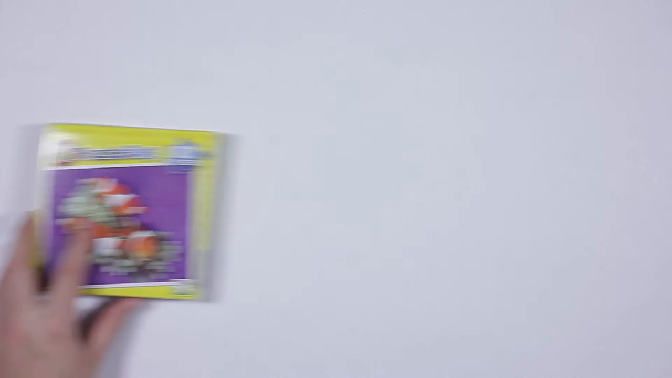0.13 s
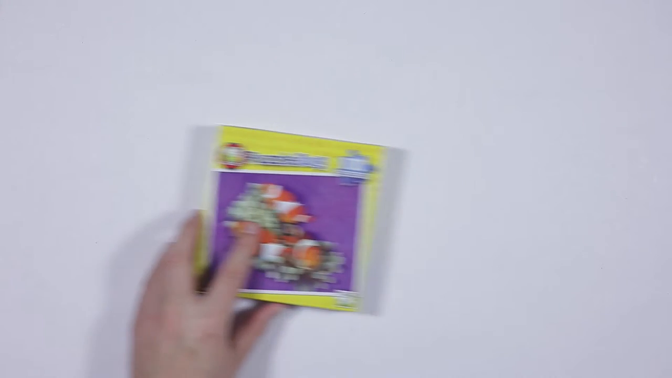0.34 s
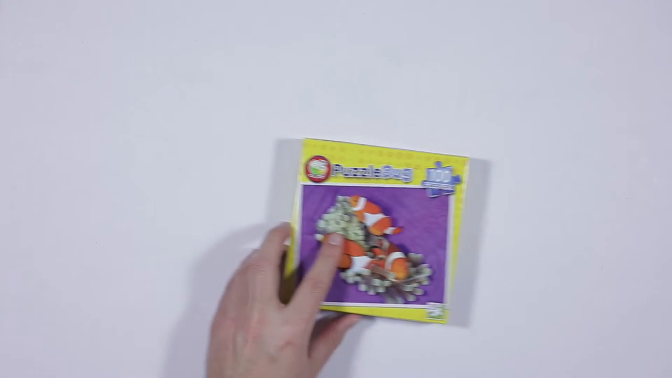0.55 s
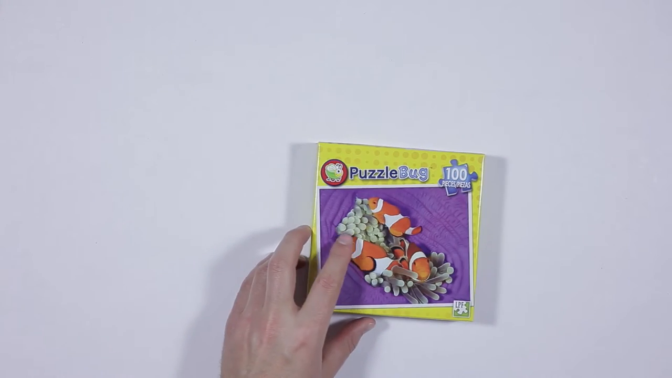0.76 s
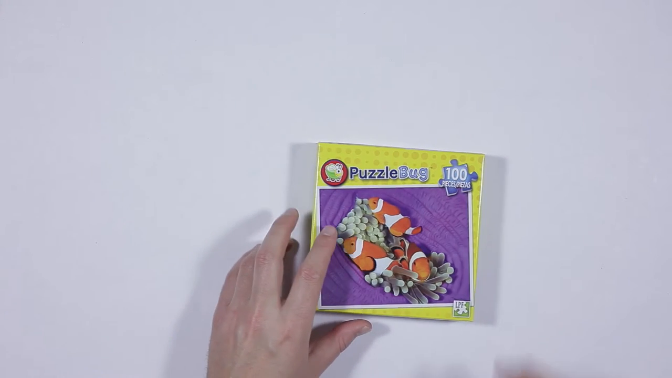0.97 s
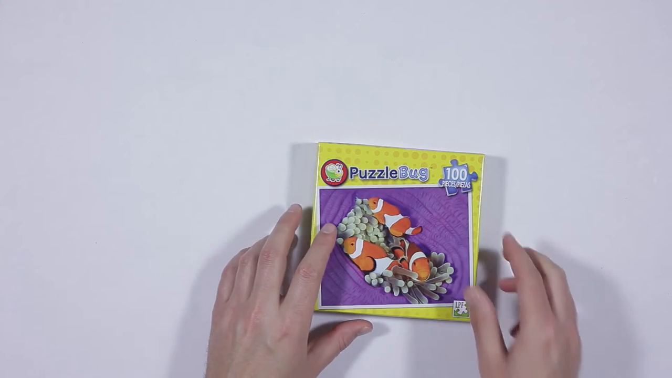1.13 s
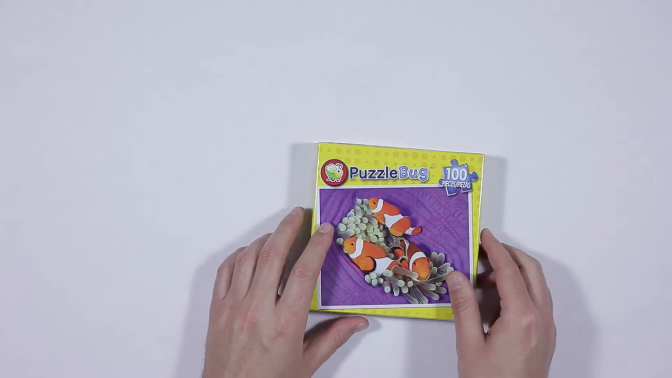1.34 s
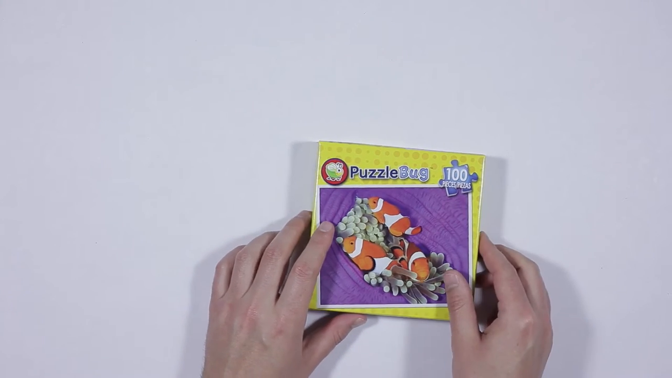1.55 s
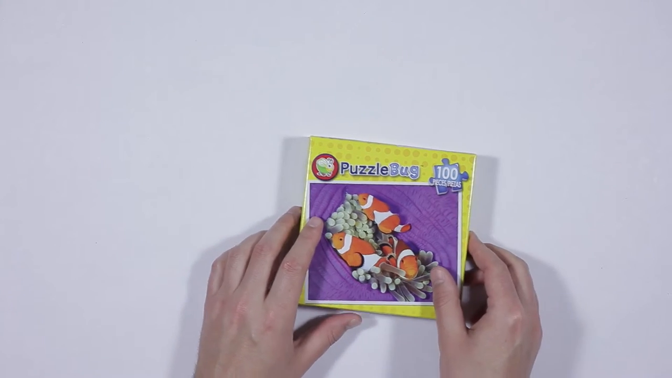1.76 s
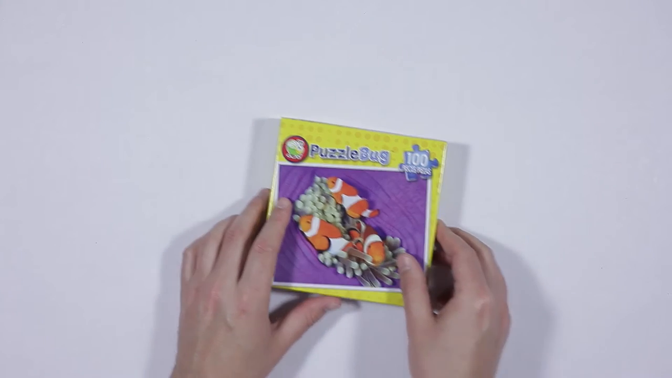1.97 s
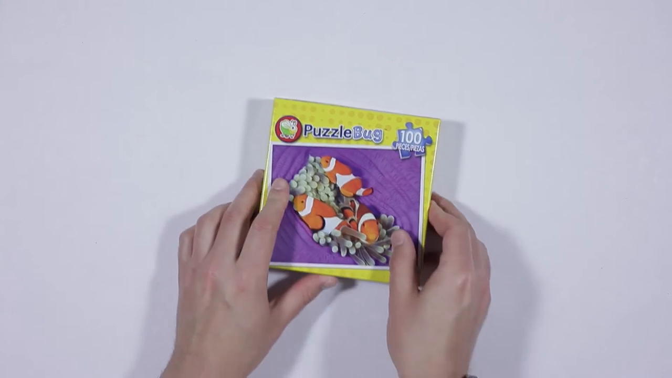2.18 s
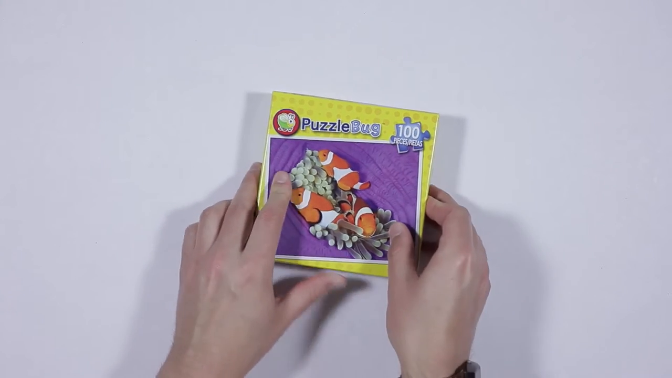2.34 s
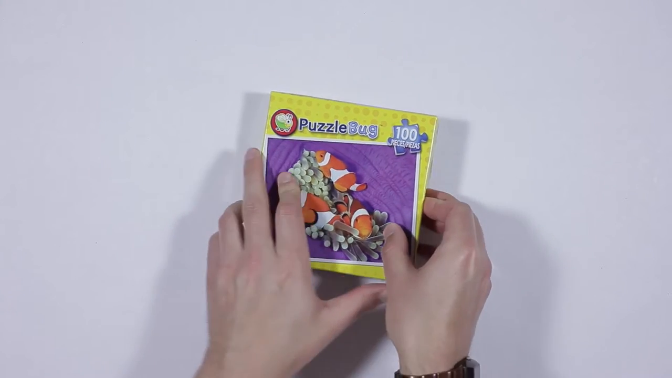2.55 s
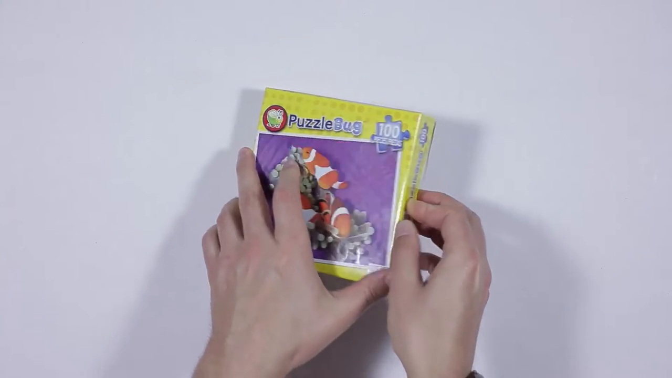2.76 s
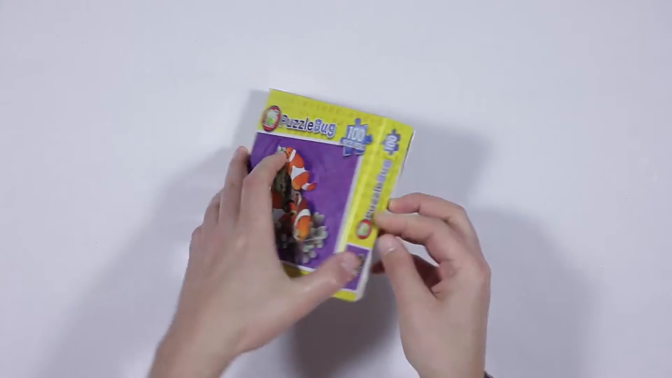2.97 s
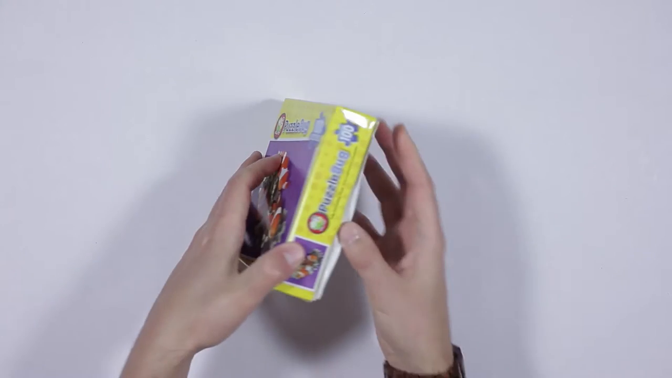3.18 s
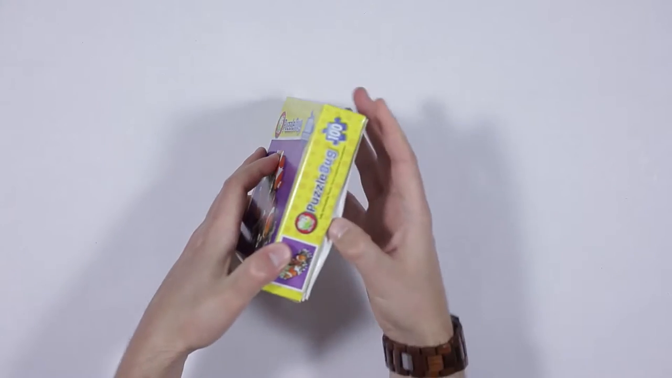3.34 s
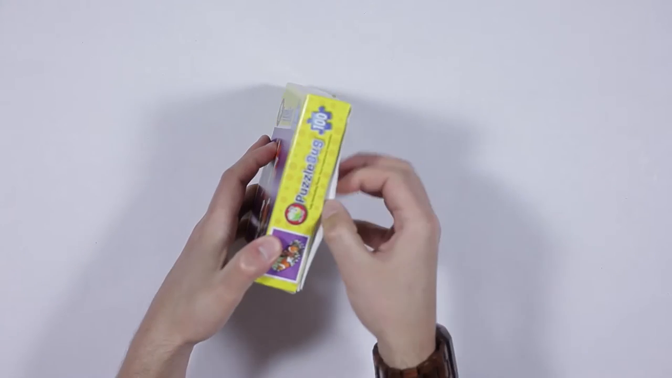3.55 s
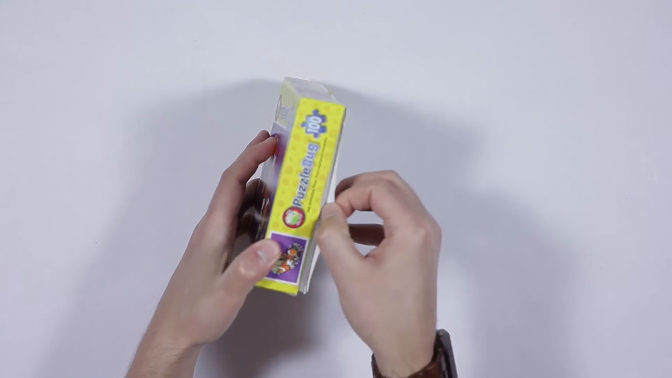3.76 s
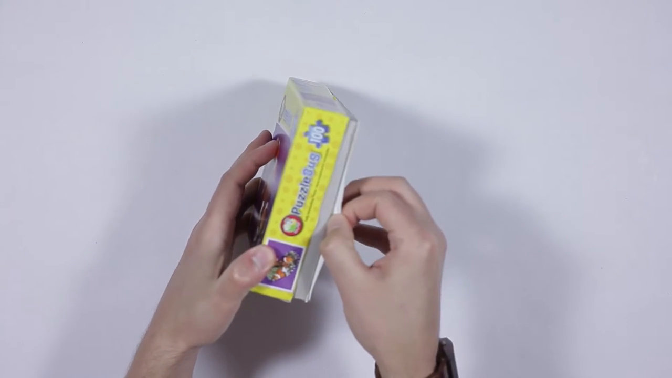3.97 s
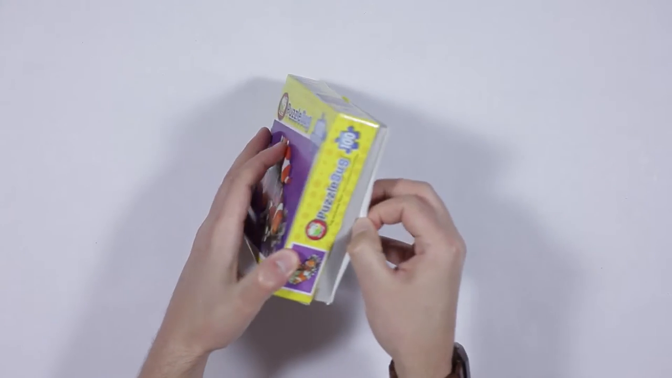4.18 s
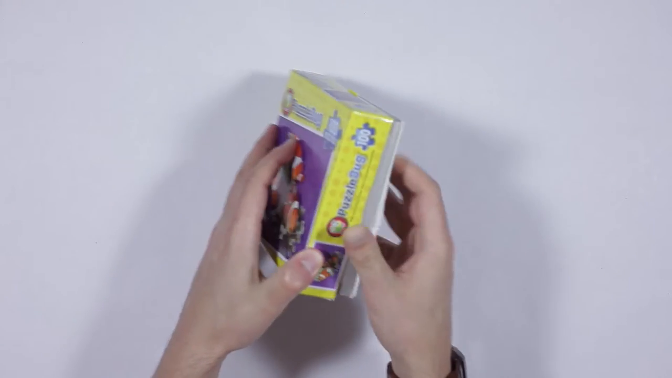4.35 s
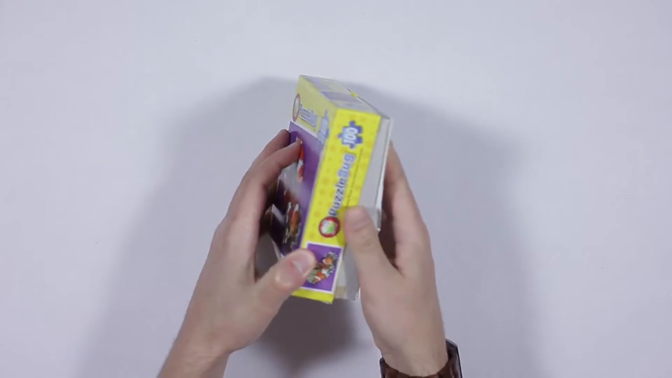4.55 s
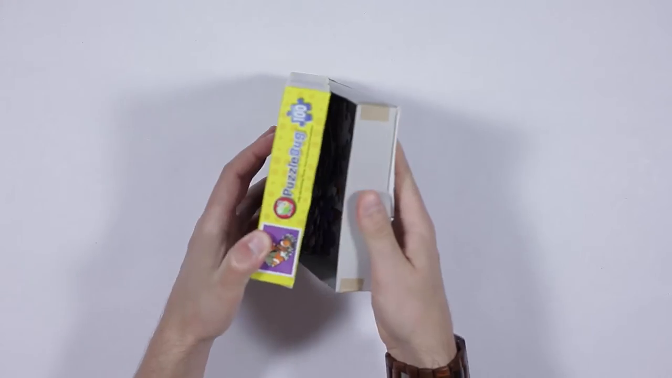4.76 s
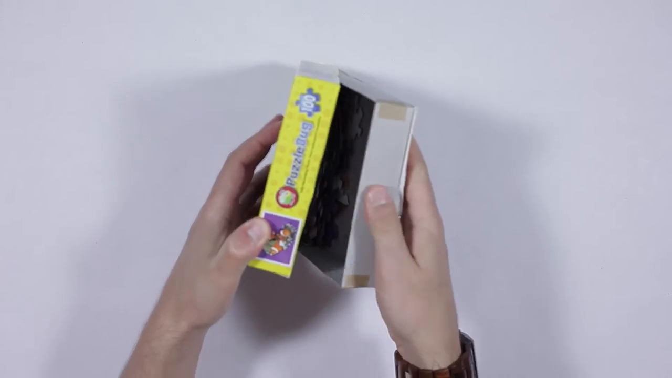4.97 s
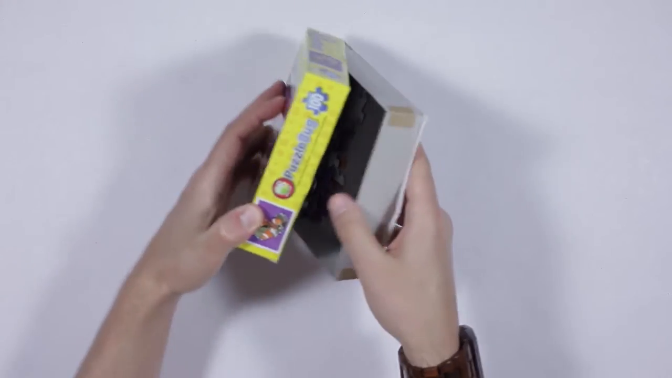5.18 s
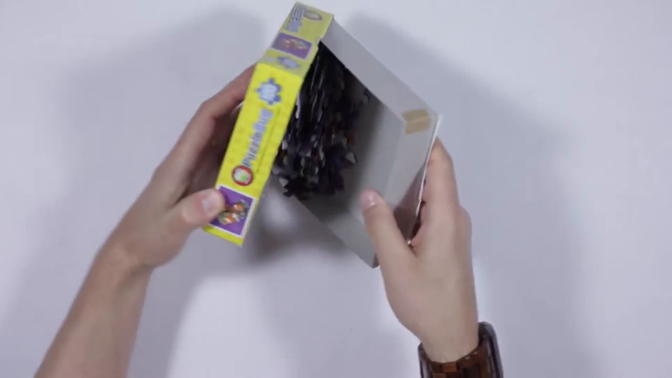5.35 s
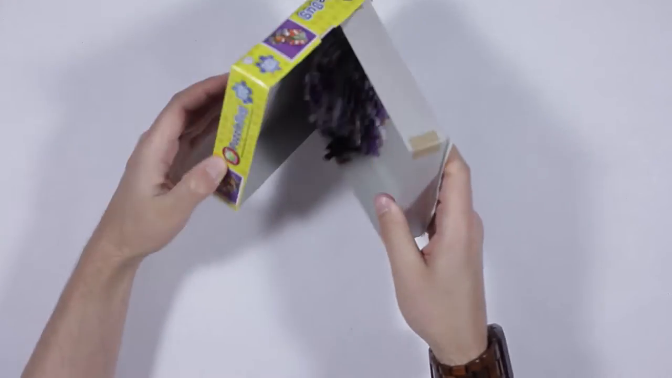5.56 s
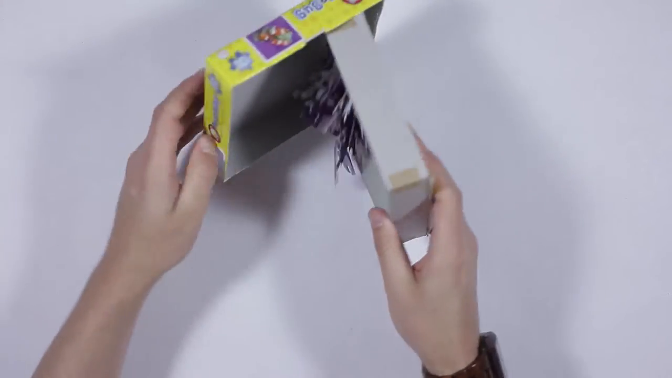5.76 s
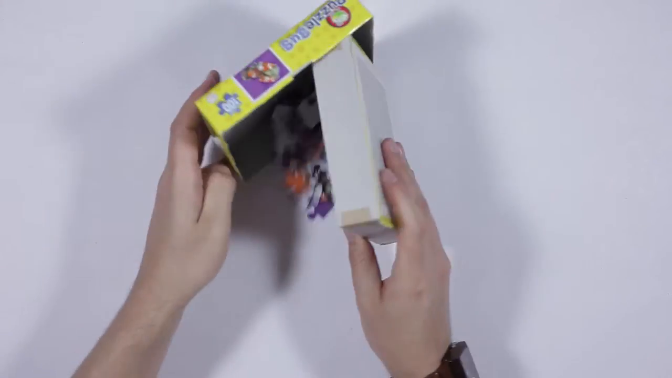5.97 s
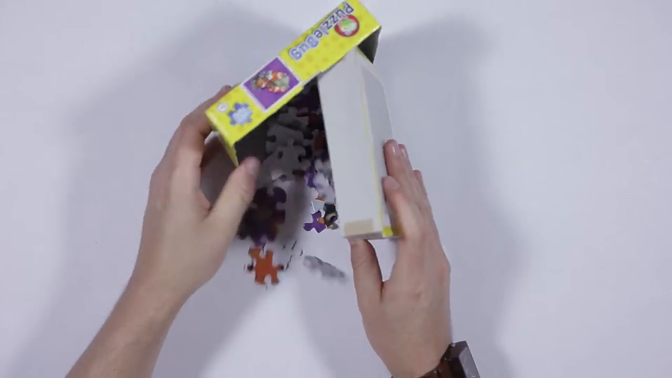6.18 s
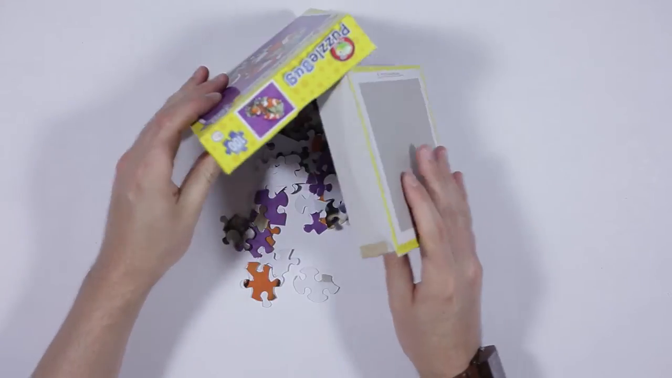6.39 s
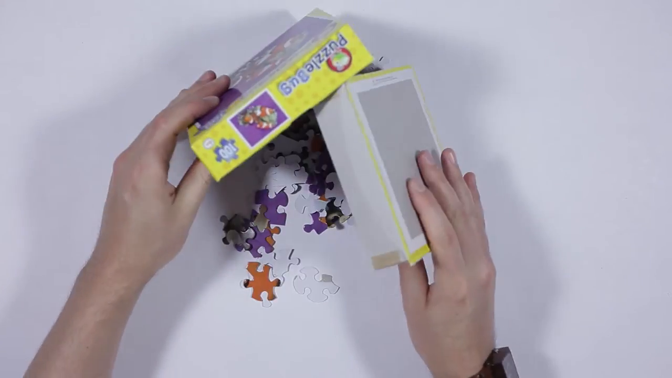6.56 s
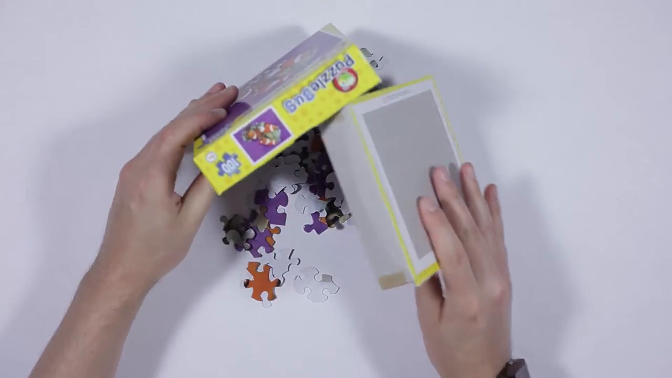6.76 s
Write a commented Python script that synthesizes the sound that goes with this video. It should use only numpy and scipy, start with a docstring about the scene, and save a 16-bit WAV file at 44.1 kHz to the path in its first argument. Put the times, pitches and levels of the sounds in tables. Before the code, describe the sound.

A cardboard puzzle box slides over a table, is prised open with scrapes and snaps, and loose pieces spill out.

```python
"""A cardboard puzzle box slides over a table, is turned, prised open and tipped out, close by.
Card hisses as it rubs on paper and skin. Loose pieces tumble inside and make the hollow box ring,
low while it is shut and higher once it is open. Edges snap, pieces tick on the table, and soft
blows make the table top ring. A small quiet room answers; air rushes and lamps hum faintly."""
import sys
import numpy as np
from scipy import signal
from scipy.fft import rfft, irfft, next_fast_len
from scipy.io import wavfile
from scipy.ndimage import uniform_filter1d, map_coordinates

SR = 44100
rng = np.random.default_rng(int(sys.argv[2]) if len(sys.argv) > 2 else 0)


def store_wav(level_fs):
    """Save 16-bit WAV to argv[1]."""
    pcm = np.round(np.clip(np.atleast_2d(level_fs), -1, 1) * 32767)
    wavfile.write(sys.argv[1], SR, pcm.T.astype(np.int16))


N = 300762

# The box slides over the table twice, then rests in the hands. Each row: time in seconds, rubbing
# in dB, sizzle of the glossy coat in dB compared with the rubbing, drone of the box in dB.
SLIDE = [(0.0, -34.5, -10.5, -63), (0.307, -36, -10, -58), (0.517, -44.5, -15, -58.5),
         (0.635, -44, -13, -63), (0.72, -55.5, -11, -65), (0.77, -70.5, -13, -74), (0.928, -68.5, -12, -74),
         (1.185, -79, -1, -81), (1.5, -79, -7, -90), (1.634, -52, -16, -58), (1.7, -55, -16, -65),
         (1.84, -49, -15.5, -59), (2.041, -53.5, -12, -61), (2.2, -50, -6, -64), (2.33, -63, -16, -72.5),
         (3.2, -68, -8, -62), (6.82, -72, -16, -76)]


def amp(db):
    """Turn decibels into a gain."""
    return 10 ** (np.asarray(db) / 20)


def unit(x):
    """Scale a sound to an average power of 1."""
    return x / np.sqrt(np.mean(x ** 2) + 1e-20)


def along(points, hz):
    """Read between (Hz, value) points on a log frequency axis."""
    freqs, values = np.transpose(points)
    return np.interp(np.log(hz + 1), np.log(freqs + 1), values)


def curves(rows):
    """One value per sample for each column after the time."""
    times, *columns = np.transpose(rows)
    return [np.interp(np.arange(N) / SR, times, column) for column in columns]


def wobble(rate):
    """A smooth random curve through rate points a second."""
    return map_coordinates(rng.standard_normal(int(N * rate / SR) + 4), [np.arange(N) * rate / SR])


def filtered(x, response):
    """Filter x; response gives the gain at each frequency."""
    size = next_fast_len(len(x) + 8192)
    return irfft(rfft(x, size) * response(np.fft.rfftfreq(size, 1 / SR)), size)[:len(x)]


def shortest_pulse(spectrum, size=2048):
    """The shortest pulse of energy 1 with the tone colour of these (Hz, dB) points."""
    gains = amp(along(spectrum, np.fft.rfftfreq(size, 1 / SR)))
    cepstrum = irfft(np.log(gains + 1e-6), size)
    cepstrum[1:size // 2] *= 2  # folding it moves the energy to the start
    cepstrum[size // 2 + 1:] = 0
    pulse = irfft(np.exp(rfft(cepstrum)), size)[:size // 2]
    return pulse / np.linalg.norm(pulse)


def swells(peak_s, level_db, rise_s, fall_s, depth_db=26, roundness=1.04):
    """Summed power of movements that each gain depth_db over their rise and lose it over their fall."""
    samples = np.arange(0, N, 32)
    late = samples / SR - peak_s[:, None]
    away = np.where(late < 0, -late / rise_s[:, None], late / fall_s[:, None])
    power = amp(2 * (level_db[:, None] - depth_db * away ** roundness)).sum(axis=0)
    return np.interp(np.arange(N), samples, power)


def grains(rate, life_s, scatter_db=7):
    """Edges catch at random, rate times a second; each catch is a short puff of noise."""
    catches = (rng.random(N) < rate / SR) * amp(scatter_db * rng.standard_normal(N))
    fade = amp(-60 * np.arange(2000) / SR / life_s)
    return unit(signal.fftconvolve(catches, fade)[:N] * rng.standard_normal(N))


def patchy(x, depth_db, bands):
    """Every contact has its own tone colour: random gain in patches of pitch and time."""
    spectra = signal.stft(x, nperseg=256)[2]
    patches = uniform_filter1d(rng.standard_normal(spectra.shape), bands, axis=0)
    patches = uniform_filter1d(patches, 10, axis=1)
    return unit(signal.istft(spectra * amp(depth_db * unit(patches)), nperseg=256)[1][:N])


def friction(coarse, rate, life_s, bands, depth_db):
    """Fibres give a slightly uneven hiss; catching edges add coarse grains."""
    hiss = unit(rng.standard_normal(N) * amp(0.36 * wobble(40) + 0.99 * wobble(150)))
    mix = np.sqrt(1 - coarse) * hiss + np.sqrt(coarse) * grains(rate, life_s)
    return patchy(mix, depth_db, bands)


def rubbing(coarse, sizzle_hz=10000):
    """Card rubs on paper and skin: a broad hiss, with more or less sizzle on top."""
    # Strokes of card on skin and card. Each row: peak time in seconds, level in dB,
    # rise and fall in seconds, sizzle in dB compared with the level.
    strokes = [(1.273, -60.5, 0.028, 0.071, -22), (1.431, -60, 0.055, 0.28, -24), (2.15, -51, .08, .08, -9),
               (2.205, -52, .08, 0.18, -15), (2.349, -60.5, .06, .4, -10), (2.482, -72, .05, 0.34, -12),
               (2.62, -60, 0.055, 0.44, 3), (2.672, -43.5, .03, .13, -10), (2.77, -50.5, .1, 0.63, -15),
               (2.923, -60, 0.14, .3, -3), (2.995, -34, 0.018, 0.11, -19), (3.035, -34, 0.057, 0.17, -15),
               (3.38, -66, .035, 0.037, -24), (3.465, -48, 0.04, 0.08, -12), (3.642, -53, 0.016, 0.1, -12),
               (3.857, -48.5, 0.2, 0.14, -6.5), (3.943, -52.5, 0.13, 0.03, -10),
               (4.08, -45, .07, 0.028, -8), (4.226, -45.5, 0.21, 0.13, -16),
               (4.338, -51, 0.028, 0.027, -3.5), (4.41, -48, 0.083, 0.081, -13),
               (4.53, -49, 0.043, 0.45, -6.5), (4.63, -42.5, 0.13, 0.19, -7.5), (4.69, -40, 0.09, .1, -10),
               (4.905, -55, 0.028, 0.12, -7), (4.981, -53, 0.15, 0.55, -13), (5.248, -41, .13, 0.072, -10),
               (5.308, -41, .07, 0.082, -14), (5.446, -44, 0.16, 0.062, -23.5),
               (5.511, -44, 0.12, 0.24, -9), (5.677, -37.5, 0.083, 0.26, -20),
               (5.823, -38.5, 0.14, 0.32, -16), (5.937, -31, 0.098, 0.29, -8),
               (6.12, -41, 0.089, 0.23, -5.5), (6.249, -41, 0.048, 0.063, -13),
               (6.407, -35, 0.11, 0.18, -5.5), (6.475, -37.5, 0.12, 0.086, -27),
               (6.581, -46, .1, 0.32, -12), (6.697, -46, 0.078, .15, -23),
               (6.773, -41.5, 0.03, 0.12, -10.5)]
    # The tone colour of rubbed paper. Each row: frequency in Hz, level in dB.
    paper = [(180, -84.5), (300, -97), (354, -60), (584, -56), (749, -10), (994, -22.5), (1300, -13),
             (1970, -12.5), (3700, -3), (4400, 3), (5200, 3), (6200, 3), (7950, 5.5), (16000, -23)]
    slide_db, coat_db, _ = curves(SLIDE)
    peak_s, level_db, rise, fall, sizzle_db = np.transpose(strokes)
    hiss_power = amp(2 * slide_db) + swells(peak_s, level_db, rise, fall)
    sizzle_power = amp(2 * (slide_db + coat_db)) + swells(peak_s, level_db + sizzle_db, rise, fall)
    scrape = friction(coarse, rate=250, life_s=0.017, bands=8, depth_db=1.56)
    rub = signal.fftconvolve(scrape, shortest_pulse(paper))[:N]
    sizzle = filtered(rub, lambda hz: 1 / (1 + (sizzle_hz / (hz + 1)) ** 12))
    return np.sqrt(hiss_power) * unit(rub - sizzle) + np.sqrt(sizzle_power) * unit(sizzle)


def shifting(coarse, weight_hz=900):
    """Sliding and shifting shake the walls of the box; weight is heard in the low part."""
    # Pieces and fingers move against the box. Each row: peak time in seconds, level in dB,
    # rise and fall in seconds, low part in dB compared with the level.
    shifts = [(1.279, -71, .05, .05, 3), (1.425, -67.5, .045, 0.23, -4), (2.15, -45, 0.015, 0.032, 3.5),
              (2.21, -49.5, 0.064, 0.1, -0.5), (2.35, -58, 0.13, 0.18, 3.5),
              (2.484, -63.5, 0.017, .1, 17.5), (2.612, -64, .07, .1, 5), (2.672, -68, 0.044, .3, 6),
              (2.77, -50.5, 0.12, 0.48, 5), (2.997, -32, 0.041, 0.24, 0.5), (3.081, -30, 0.14, 0.13, 3.5),
              (3.15, -39, 0.12, 0.043, 8.5), (3.263, -48, .012, 0.13, 13),
              (3.292, -43.5, 0.067, 0.094, 7.5), (3.474, -50.5, 0.082, .11, -7),
              (3.646, -48.5, 0.027, 0.12, 4.5), (3.77, -57, 0.068, .1, 14), (3.869, -48.5, 0.14, 0.4, 4),
              (4.087, -41.5, 0.06, .045, 3), (4.159, -44, 0.13, 0.067, 1), (4.229, -45, 0.1, .065, 3),
              (4.44, -53.5, 0.34, .1, 6.7), (4.538, -46.5, 0.08, 0.36, 0.5), (4.7, -41.5, 0.21, 0.13, 3.5),
              (4.977, -55, 0.092, 0.16, 6), (5.095, -52, 0.023, 0.061, 7.5), (5.246, -49, 0.26, 0.092, -2),
              (5.306, -46, 0.084, 0.2, -8), (5.41, -51, 0.054, 0.049, -12),
              (5.452, -38.5, 0.031, 0.11, 9.5), (5.56, -49, 0.33, 0.31, 0),
              (5.699, -37.5, 0.022, 0.069, -3.5), (5.821, -40, 0.16, 0.15, 1), (5.859, -32, 0.01, 0.21, -1),
              (5.915, -24, 0.017, 0.086, -1.5), (5.976, -27, 0.078, 0.047, 2),
              (6.04, -37, 0.091, 0.21, -1.5), (6.2, -50.5, 1, 0.32, 4), (6.322, -42, 0.014, 0.086, 5.5),
              (6.414, -37, 0.089, 0.2, 4.5), (6.591, -47, 0.06, 0.13, -5), (6.708, -43.5, 0.051, 0.17, 3)]
    drone_power = amp(2 * curves(SLIDE)[2])
    peak_s, level_db, rise, fall, weight_db = np.transpose(shifts)
    high_power = drone_power + swells(peak_s, level_db, rise, fall)
    low_power = drone_power + swells(peak_s, level_db + weight_db, rise, fall)
    scrape = friction(coarse, rate=150, life_s=0.025, bands=2, depth_db=2.5)
    low = filtered(scrape, lambda hz: 1 / (1 + (hz / weight_hz) ** 6))
    return np.sqrt(high_power) * (scrape - low) + np.sqrt(low_power) * low


def resonances(peaks, floor_db):
    """A filter response with ringing peaks over a flat floor."""
    return lambda hz: amp(floor_db) + sum(
        amp(db) * 1j * hz * width / (centre ** 2 - hz ** 2 + 1j * hz * width)
        for centre, width, db in peaks)


def hollow_box(shaking, opening):
    """The hollow box rings low when shut, higher and thinner when open."""
    # The tone colour of card around trapped air, and open to the room.
    # Each row: frequency in Hz, level in dB.
    shut_walls = [(90, -33), (250, -10), (500, -10), (1200, -7), (3000, -9.5), (9000, -30)]
    open_walls = [(150, -33.5), (500, -8.5), (900, -4), (2500, -1.5), (3600, -6), (9000, -31)]
    # The notes of the box with its lid on and off. Each row: pitch in Hz, width in Hz, level in dB.
    shut_notes = [(460, 32, 0.5), (619, 80, -4), (777, 84, 2), (1600, 360, -5.5), (2450, 250, -13)]
    open_notes = [(755, 36, -7.5), (994, 240, -7.5), (1151, 149, 0.5), (1379, 36, 0), (1850, 53, -7),
                  (2500, 320, -13), (2900, 130, -5.5)]
    shut = signal.fftconvolve(shaking * np.sqrt(1 - opening), shortest_pulse(shut_walls))[:N]
    opened = signal.fftconvolve(shaking * np.sqrt(opening), shortest_pulse(open_walls))[:N]
    return (filtered(shut, resonances(shut_notes, floor_db=-8.5))
            + filtered(opened, resonances(open_notes, floor_db=-4.5)))


def room_echo(x, block=8192, delay=120):
    """The room's echo dies faster in the treble and keeps changing as the hands move."""
    # How long the room rings. Each row: frequency in Hz, seconds to fade by 60 dB.
    fade_times = [(300, 0.97), (1300, 0.22), (3500, 0.17), (10000, 0.026)]
    echo = np.zeros(N + SR)
    for start in range(0, N, block):
        hz, t, spectra = signal.stft(rng.standard_normal(SR // 3), SR, nperseg=256)
        fade = amp(-60 * t / along(fade_times, hz)[:, None])
        tail = signal.istft(spectra * fade, SR, nperseg=256)[1]
        answer = signal.fftconvolve(x[start:start + block], tail / np.linalg.norm(tail))
        echo[start + delay:][:len(answer)] += answer
    return echo[:N]


def room_tone():
    """Steady air and ventilation noise, with the hum of the lamps."""
    # The colour of the air noise, and the lamps' tones. Each row: frequency in Hz, relative level in dB.
    air_colour = [(12, -6.5), (24, 1.5), (40, -7.5), (70, -12.5), (100, -19.5), (300, -22.5), (450, -32.5),
                  (1000, -32.5), (1140, -24.5), (1290, -37), (5000, -34.5), (9000, -47.5), (16000, -38.5)]
    lamp_tones = [(120, -77.5), (360, -87), (720, -88), (840, -81.5), (1200, -96), (2525, -84.5)]
    air = unit(filtered(rng.standard_normal(N), lambda hz: amp(along(air_colour, hz))))
    t = np.arange(N) / SR
    hum = sum(amp(db + 5 + 0.71 * wobble(2.12)) * np.sin(2 * np.pi * (hz * t + rng.random()))
              for hz, db in lamp_tones)
    return amp(-60) * air + hum


def ticks():
    """Each tick is a sharp blow with a short rattle; a softer knock is returned for the box."""
    # Edges snap and pieces tick. Each row: start in seconds, level in dB, pitch in Hz, spread in octaves.
    hits = [(2.1258, -31.5, 8810, .69), (2.1463, -27.5, 7400, 0.64), (2.1875, -28.5, 6850, 0.53),
            (2.2046, -24, 6940, 0.41), (2.3454, -39, 6550, 0.59), (2.4241, -30, 7980, 0.64),
            (2.4684, -24, 5700, 0.43), (2.616, -39, 8480, .19), (2.658, -8.5, 7200, 0.58),
            (2.7054, -29, 8340, .35), (2.768, -31, 7030, .32), (2.9235, -32, 7200, 0.19),
            (2.9817, 3.5, 4960, .82), (3.0316, -33, 7000, .78), (3.0588, -17, 3850, .88),
            (3.08, -10.5, 6900, .36), (3.258, -37, 2870, 0.66), (3.2905, -33, 2570, .87),
            (3.4406, -39, 6540, .84), (3.4473, -32, 5300, 0.69), (3.6367, -37, 3250, 1.27),
            (3.85, -31, 7200, 0.21), (4.0184, -35, 7700, .29), (4.0327, -37, 3180, 0.98),
            (4.0805, -33, 4420, .96), (4.161, -39, 2230, 1.26), (4.2114, -11, 6700, 1),
            (4.298, -26.5, 4230, 0.76), (4.4046, -31.5, 5900, 0.83), (4.4623, -41, 2940, 1.1),
            (4.6276, -23.5, 7880, .15), (4.6908, -10, 8900, 0.27), (4.695, -8.5, 6550, 0.91),
            (4.8094, -26.5, 6500, .47), (4.902, -48, 4500, 1.1), (5.2342, -8.5, 6000, 0.55),
            (5.2913, -4.5, 4800, 0.65), (5.4097, -24, 3530, 1.2), (5.4434, -20.5, 3400, 1.3),
            (5.646, -18.5, 5720, .9), (5.6954, -15, 5100, 0.62), (5.809, -6.5, 6400, 0.11),
            (5.82, -17, 3580, 0.95), (5.8531, -25, 2370, .42), (5.912, -24, 2330, .38),
            (5.9288, -20, 2460, .77), (5.955, -13.5, 6700, 0.11), (5.963, -9, 6700, 0.44),
            (5.9838, -14.5, 6300, 0.59), (6.0318, -12, 7900, 0.25), (6.102, -14.5, 8700, 0.43),
            (6.111, -15, 9500, 0.37), (6.1372, -16, 6560, 0.13), (6.2386, -22, 6460, 0.43),
            (6.2904, -28, 6850, 0.37), (6.309, -19, 5950, .51), (6.3252, -28, 5160, 0.43),
            (6.3544, -31, 5770, 0.37), (6.368, -29, 5630, 0.17), (6.3962, -13, 7400, 0.21),
            (6.4336, -12.5, 6650, .34), (6.4613, -8.5, 7840, 0.15), (6.5775, -23.5, 5560, 0.54),
            (6.606, -25.5, 6100, 1.1), (6.6644, -19, 5270, 0.21), (6.6955, -23, 5100, 0.24),
            (6.7345, -27, 5140, 0.23), (6.7928, -26.5, 4740, 0.28)]
    # The ticks have little bass and a softened top treble. Each row: frequency in Hz, level in dB.
    tick_colour = [(200, -15), (1500, 4.5), (9000, 2.5), (11000, -4.0), (16000, -7.5)]
    crack, knock = np.zeros((2, N + SR))
    t = np.arange(3072) / SR
    rattle_fade = amp(-3.5 - 60 * t / 0.0026) + amp(-60 * t / 0.014) + amp(-22 - 60 * t / 0.15)
    rattle_shape = rattle_fade * (1 - np.exp(-t / 0.00024))
    knock_shape = amp(-60 * t / 0.043) * (1 - np.exp(-t / 0.001))
    steps = np.arange(-6, 7)
    for start_s, db, hz, spread in hits:
        rattle_noise, knock_noise = rng.standard_normal((2, len(t)))
        band_hz = hz * 2 ** (spread * steps / 2)
        band_db = np.maximum(-0.55 * steps ** 2, -19) + along(tick_colour, band_hz)
        blow = shortest_pulse([(104, -71), *zip(band_hz, band_db)], size=512)
        rattle = signal.fftconvolve(rattle_noise * rattle_shape, blow)[:len(t)]
        # Rattle and knock grow more slowly than the blow; duller ticks knock more.
        rattle_db = -31.5 + 0.76 * (db + 19.5)
        knock_db = -39 + 0.51 * (db + 20) - 13 * np.log2(hz / 5000)
        start = round(start_s * SR)
        crack[start:][:len(blow)] += amp(db - 2.5) * blow / np.max(np.abs(blow))
        crack[start:][:len(t)] += amp(rattle_db) * rattle
        knock[start:][:len(t)] += amp(knock_db) * knock_noise * knock_shape
    return crack[:N], knock[:N]


def table_thumps(thud_s=0.03, thud_hz=410):
    """A padded blow thuds and rings the table top; resting arms make the ring waver."""
    # Soft blows that reach the table. Each row: start in seconds, level in dB.
    blows = [(4.207, -43.5), (5.44, -24), (5.696, -41.5), (5.82, -43.5), (6.411, -53), (6.459, -45.5),
             (6.706, -50)]
    # The table's low notes. Each row: pitch in Hz, relative level in dB, seconds to fade by 60 dB.
    notes = [(64, -17, 0.23), (131, -4, 0.42), (192.5, -10.5, 0.3), (259, -1, 0.4), (347, -16, 0.49),
             (438, -18, 0.42), (540, -7, 0.15), (658, -13, 0.29)]
    ringing, thud_gain = np.zeros((2, N + SR))
    t = np.arange(SR // 2) / SR
    wavers = [amp(4 * np.tanh(wobble(35))) for _ in notes]
    noise = rng.standard_normal(N + SR)
    dull_noise = unit(filtered(noise, lambda hz: hz / (hz + 40) / (1 + (hz / thud_hz) ** 2)))
    for start_s, db in blows:
        start = round(start_s * SR)
        thud_gain[start:][:len(t)] += amp(db - 0.5 - 60 * t / thud_s) * (1 - np.exp(-t / 0.0014))
        for (hz, note_db, fade_s), waver in zip(notes, wavers):
            shape = amp(db - 4.5 + note_db - 60 * t / fade_s) * (1 - np.exp(-t / 0.0056))
            ringing[start:][:len(t)] += shape * np.sin(2 * np.pi * hz * t) * waver[start - len(t):start]
    return (ringing + thud_gain * dull_noise)[:N]


def scene():
    """The box is handled and opened over the table in a quiet room."""
    # How grainy the friction is. Each row: time in seconds, share of coarse grains from 0 to 1.
    graininess = [(0, 0), (2, 0.15), (2.3, 0.38), (4.5, 0.28), (5, 0.14), (5.7, 0.44), (6.82, 0.38)]
    coarse = curves(graininess)[0]
    opening = curves([(4.6, 0.11), (4.66, 0.96)])[0]  # the share of open-box sound jumps as the lid parts
    shaking = shifting(coarse)
    crack, knock = ticks()
    near = rubbing(coarse) + crack + hollow_box(shaking + knock, opening)
    return (near + amp(-10.5) * room_echo(near) + table_thumps() + room_tone())[None]


def record(dry):
    """Cut away the highest treble, above 15800 Hz."""
    return filtered(dry[0], lambda hz: hz < 15800)[None]


dry = scene()
out = record(dry)
store_wav(out)
```